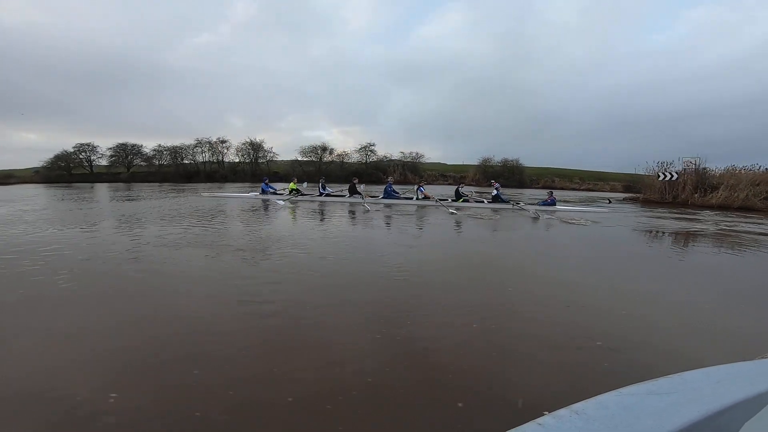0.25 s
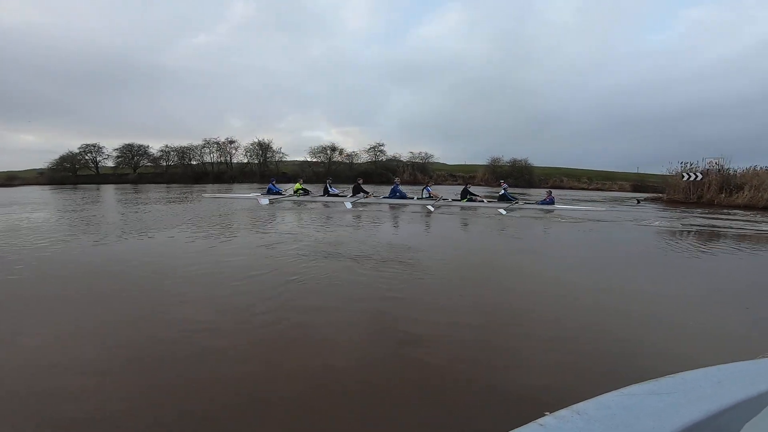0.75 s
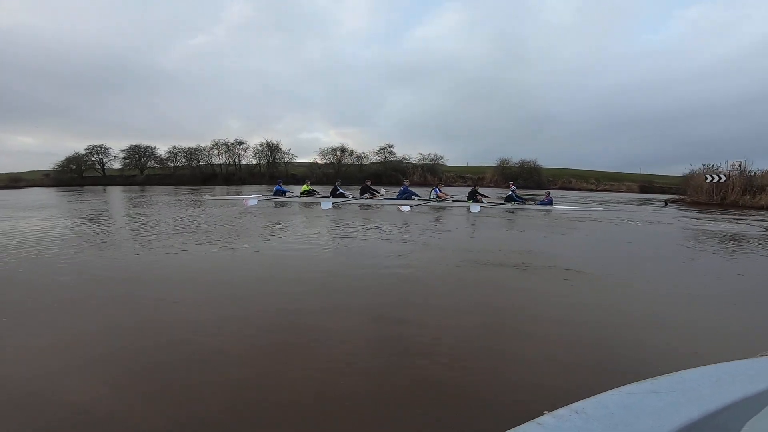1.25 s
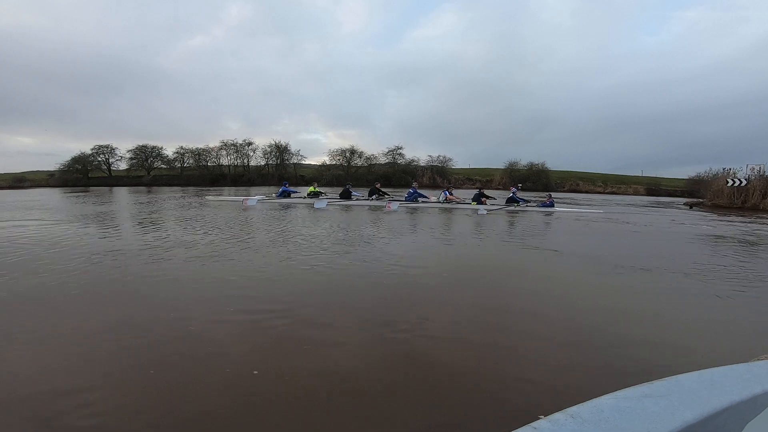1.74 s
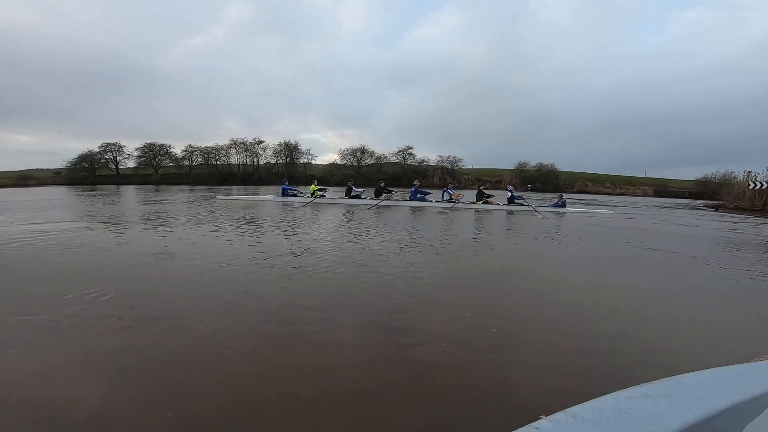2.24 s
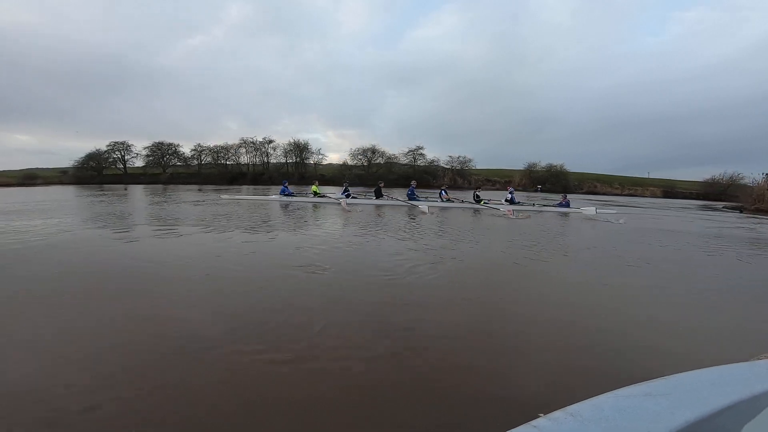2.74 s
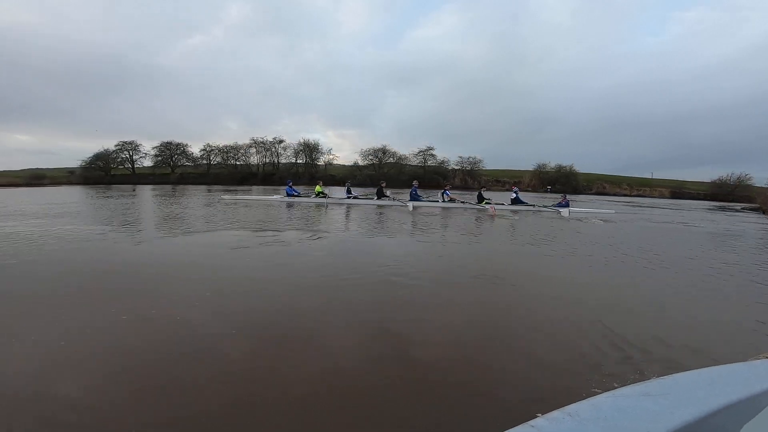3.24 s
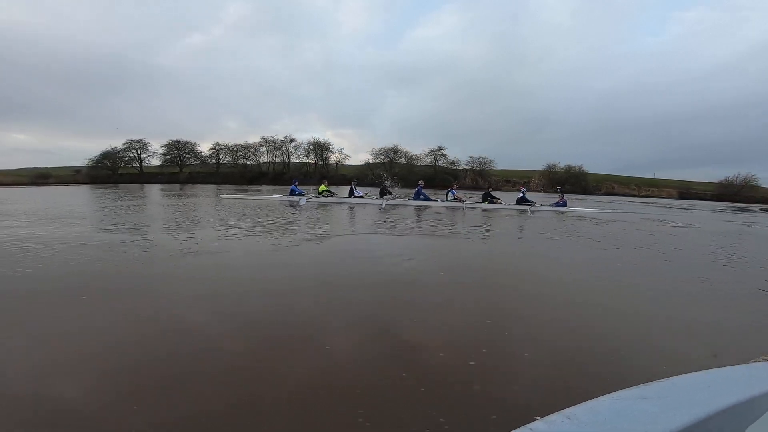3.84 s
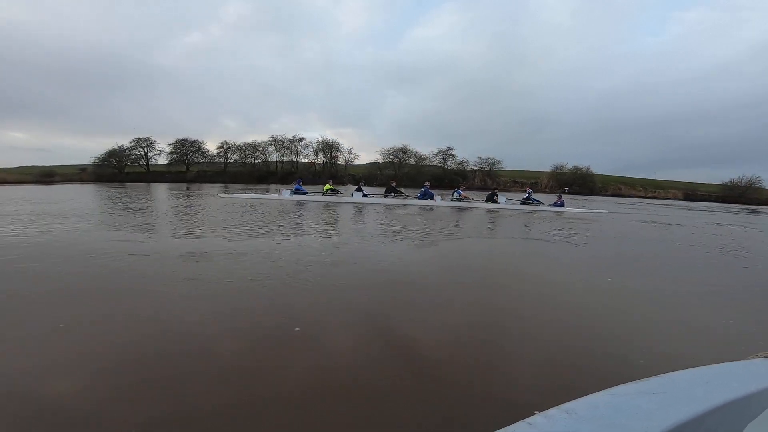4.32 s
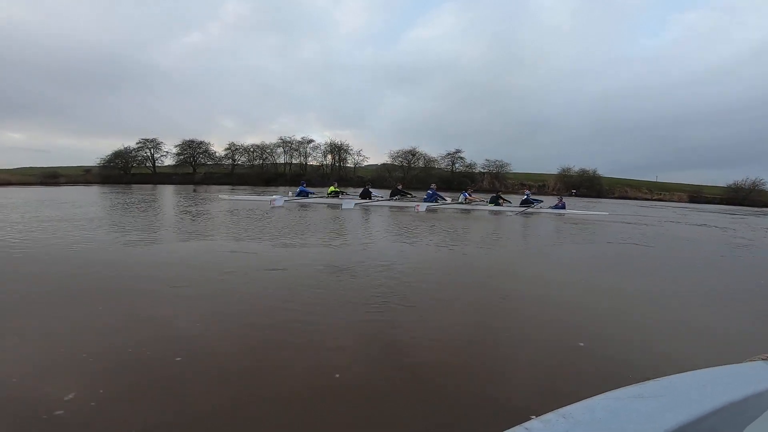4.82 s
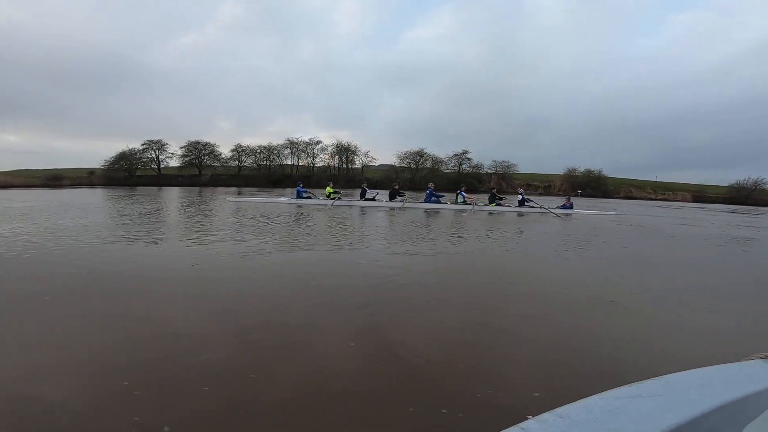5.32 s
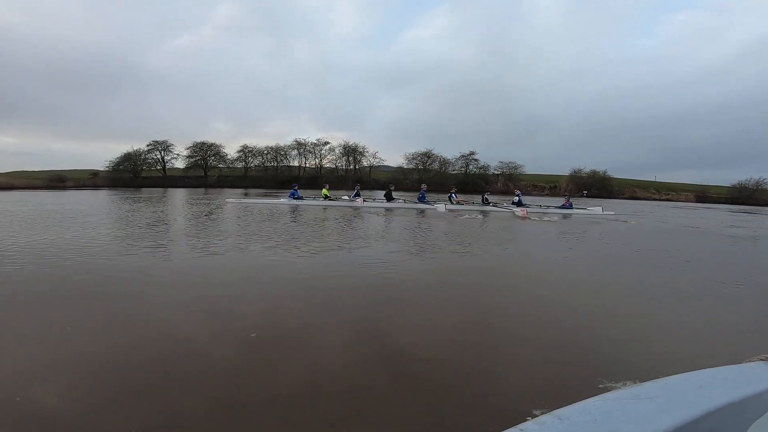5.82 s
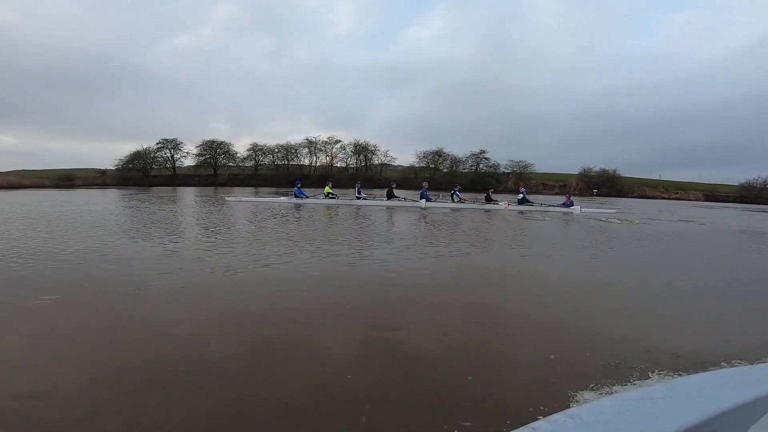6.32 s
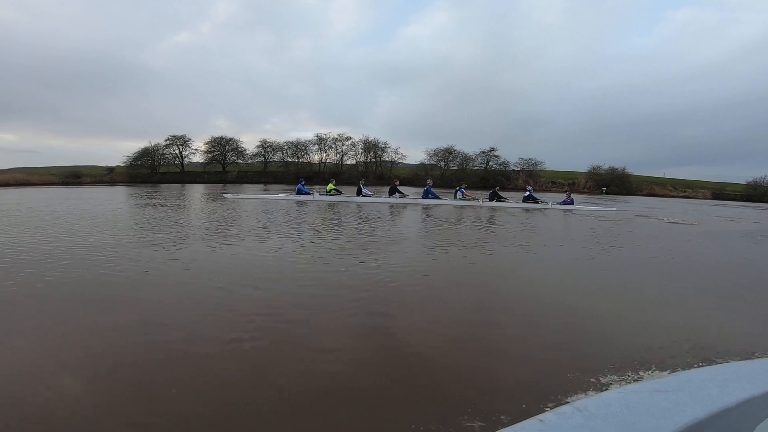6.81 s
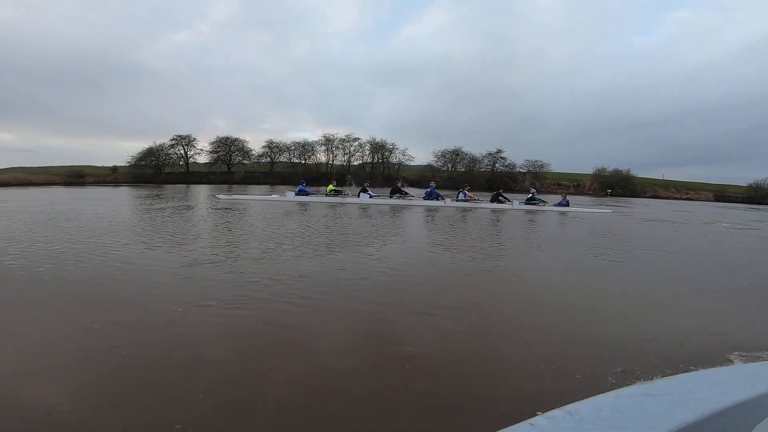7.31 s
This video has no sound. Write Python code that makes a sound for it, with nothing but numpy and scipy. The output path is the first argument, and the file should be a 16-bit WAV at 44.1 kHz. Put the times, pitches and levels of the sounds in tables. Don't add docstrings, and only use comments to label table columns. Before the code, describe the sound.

A small outboard motor hums low and steady aboard a launch, with soft wind thumps, hissing wake and occasional drops ticking on the hull.

```python
import sys
import numpy as np
from scipy import signal
from scipy.fft import rfft, irfft, next_fast_len
from scipy.io import wavfile
from scipy.ndimage import uniform_filter1d, map_coordinates

SR = 44100
rng = np.random.default_rng(int(sys.argv[2]) if len(sys.argv) > 2 else 0)


def field_ratio(decibels):
    return 10 ** (np.asarray(decibels, dtype=float) / 20)


def waveform_to_disk(signal):
    frames = np.transpose(np.atleast_2d(signal))
    scaled = np.clip(frames, -1, 1) * 32767
    samples = np.round(scaled).astype(np.int16)
    wavfile.write(sys.argv[1], SR, samples)


N = 333396

# (time [s], cycle rate [Hz], load [dB], exhaust port clear of water [dB])
MOTOR = [(0, 33.26, -4, -6), (.4, 33.2, 0, 2.5), (.8, 33.1, -2, -3), (1.15, 33.14, -6, 6),
         (1.55, 33.27, -1.5, 4.5), (1.95, 32.83, 1.5, 8), (2.35, 32.26, 1.5, 3.5), (2.75, 32.37, 1, -3),
         (3.5, 32.15, 2, -1.5), (3.95, 32.02, 0, -6.5), (4.6, 32.2, -1.5, 1), (4.95, 31.74, -1, -3.5),
         (5.4, 31.96, -1.5, 1), (6.05, 31.75, -2.5, -4), (6.55, 31.88, 3, -6.5), (6.95, 31.52, 1.5, 4.5),
         (7.3, 31.73, -0.5, 8), (7.56, 31.47, 0, 9)]
# (level [dB], share of load [dB/dB], share of port [dB/dB])
FIRING = [
    (-19.5, 0.98, .01),
    (-23.5, 0.73, .01),
    (-26, 1.32, .01),
    (-31.5, .1, 0.79),
]
# (time [s], length [s], 1st firing order [dB], 2nd [dB], higher [dB])
STUMBLES = [(.2, 0.015, -10, -17, -9), (.26, 0.028, -4, 4, 3), (.4, 0.11, 0, -1.5, -4.5),
            (1.19, .07, 1.5, 3, 1), (2.84, 0.053, -5.5, -5.5, 3.5), (3.77, 0.083, -4.5, 0, 4.5),
            (4.07, 0.032, 4, 1.5, 3), (4.3, 0.049, -5, -6.5, 1.5), (4.95, 0.069, 3, 1, 5.5),
            (5.33, 0.028, 5, -2, 0), (5.62, 0.027, 1, 3.5, 3.5), (5.79, 0.017, 2, -15.5, -10),
            (5.85, 0.028, -8, 9.5, -10), (6.65, .12, -.5, 0.5, 0.5), (7.3, 0.12, -4.5, 0, -3)]
# (order of cycle [1], level [dB])
HALF_ORDERS = [(1, -12), (3, -15.5), (5, -12.5), (7, 2)]
# (order of cycle [1], level [dB])
RASP_ORDERS = [(10, -0.5), (12, -18.5), (14, -26)]
# (order of cycle [1], level [dB])
UPPER_HALF_ORDERS = [(9, -0.2), (11, -10), (13, -29.5)]


def engine_orders():
    cycle_hz, load_db, port_db = curves(MOTOR)
    stumble_db = bumps(STUMBLES)
    faster_hz = cycle_hz - 32
    half_db = -39.5 + 5.5 * faster_hz + 0.58 * port_db
    rasp_db = -37.5 + 3 * faster_hz + 0.45 * port_db
    upper_db = -41 + faster_hz + 0.85 * port_db
    orders = []  # (order, level dB, flutter dB)
    for i, (db, load, port) in enumerate(FIRING):
        level_db = db + load * load_db + port * port_db + stumble_db[min(i, 2)]
        orders.append((2 * i + 2, level_db, 0.4))
    orders += [(k, half_db + db, 0.9) for k, db in HALF_ORDERS]
    orders += [(k, rasp_db + db, 0.8) for k, db in RASP_ORDERS]
    orders += [(k, upper_db + db, 0.9) for k, db in UPPER_HALF_ORDERS]
    return cycle_hz, orders


# (time [s], saw-like lead of each order [rad], water echo lag of 2nd firing order [rad])
PULSE_LEAN = [(0, 1.25, -.35), (1.5, 1.5, .1), (2.5, 1.7, .6), (7.56, 2.05, .75)]


def engine():
    cycle_hz, orders = engine_orders()
    angle = 2 * np.pi * np.cumsum(cycle_hz) / SR + 0.0078 * wobble(9.7)
    lean, echo_lag = curves(PULSE_LEAN)
    out = np.zeros(N)
    for order, level_db, flutter_db in orders:
        k = round(order)
        cowl_lag = 2.2 * np.exp(-((k - 8) / 1.5) ** 2)
        phase = k * angle + lean - cowl_lag + 0.022 * wobble(17)
        if k == 4:
            phase = phase - echo_lag
        out += np.sqrt(2) * field_ratio(level_db + flutter_db * wobble(8.8)) * np.cos(phase)
    return out


# (time [s], length [s], microphone [dB], hull panel [dB], deck [dB])
GUSTS = [(.06, .05, 3, 4, 4), (.27, 0.025, 6, 9.5, 5.5), (.58, 0.071, 3, 2.5, 2), (.96, .04, 4, 6.5, 4),
         (1.25, 0.061, -2.5, 2, 4.5), (2.2, 0.072, -1, 6, 2), (2.7, 0.063, 5.5, -3.5, 2.5),
         (3.39, .04, 10, .5, -0.5), (3.6, 0.057, 4, 7, 7.5), (3.75, 0.054, 4, 4, 6),
         (4.19, 0.038, .5, 1, -5), (5.0, 0.072, 5, 8.5, 7.5), (5.6, 0.068, 11, 8.5, 6.5),
         (5.9, 0.086, 4.5, 1.5, 9.5), (6.42, 0.14, 1, 3.5, 3.5), (6.78, 0.061, 1, 4.5, 6),
         (6.95, 0.032, 10, 4, 3), (7.09, 0.05, 9.5, -2, 3.5), (7.56, 0.051, 13, -4, 1)]
# (frequency [Hz], density [dB/Hz])
BUFFET = [(12, -31.5), (20, -4), (35, -5), (55, 1), (80, -17.5), (140, -39.5)]
# (frequency [Hz], density [dB/Hz])
PANEL = [(30, -25), (70, -8.5), (82, -2), (91, -0.5), (100, -5), (125, -7.5), (170, -21)]
# (frequency [Hz], density [dB/Hz])
DRONE = [(90, -25), (130, -9.5), (160, 1), (215, -1), (250, -6.5), (300, -35)]
# (frequency [Hz], density [dB/Hz])
RATTLE = [(200, -27.5), (250, -6.5), (280, 0.5), (325, -3), (350, -8), (450, -22), (800, -46.5)]


def rumble():
    air_db, hull_db, deck_db = bumps(GUSTS)
    shake_db = 2.2 * (curves(MOTOR)[0] - 32)
    lump_db = 0.7
    panel_db = -28.5 + hull_db + 0.19 * shake_db + lump_db * wobble(8)
    drone_db = -31.1 + deck_db + shake_db + lump_db * wobble(8)
    rattle_db = -39.5 + 1.04 * deck_db + 1.4 * shake_db + lump_db * wobble(9.7)
    gusty = field_ratio(1.1 * wobble(14)) * rng.standard_normal(N)
    out = field_ratio(-34 + air_db) * coloured(gusty, BUFFET)
    for db, body in [(panel_db, PANEL), (drone_db, DRONE), (rattle_db, RATTLE)]:
        out += field_ratio(db) * coloured(rng.standard_normal(N), body)
    return out


# (time [s], stern churn [dB], bow spray [dB])
FLOW = [(0, -1.5, 0.5), (.25, 1.5, 2), (.65, -1.5, 1.5), (1, -1, -0.5), (1.9, 2.5, -.5), (2.3, 0, -1),
        (2.75, 0.5, 1.5), (3.6, -0.5, -2), (4.4, 1, 0.5), (5, 2, 1.5), (5.3, -.5, 1.5), (5.85, 0, 3.5),
        (6.2, -2.5, 4.5), (6.7, -1.5, 2.5), (7, 0.8, 4), (7.3, 0, 2), (7.56, -1.5, 3.5)]
# (start [s], rise [s], hold [s], fall [s], level [dB])
WAVES = [
    (.95, 0.41, 0.54, 0.24, 3),
    (2.6, 0.087, 0.035, 0.082, 2),
    (3.294, 0.15, 0.36, .3, 2),
    (5.5, 0.544, 0.18, 0.11, 1),
    (6.222, 0.19, 0.22, 0.29, 5.5),
    (6.596, 0.31, 0.16, .15, 2.5),
]
# (frequency [Hz], density [dB/Hz])
GURGLE = [(250, -28.5), (380, -2), (650, -3.5), (1000, -8), (1400, -13.5), (2500, -40.5)]
# (frequency [Hz], density [dB/Hz])
WASH = [(700, -29), (1200, -6), (1550, 2.5), (2600, 1.5), (3400, -2), (4000, -15), (5000, -31)]
# (frequency [Hz], density [dB/Hz])
FIZZ = [(2500, -20.5), (3700, 3.5), (4200, -0.5), (5050, -2), (5500, -15), (6500, -43)]
# (frequency [Hz], density [dB/Hz])
SPRAY = [(3000, -19), (4500, 1), (5600, -.5), (7600, -1), (8800, -7), (10300, -12), (12300, -21.5),
         (14200, -33)]


def wake():
    churn_db, spray_db = curves(FLOW)
    wave_db = np.zeros(N)
    for s, rise, hold, fall, db in WAVES:
        wave_db += np.interp(np.arange(N) / SR, np.cumsum([s, rise, hold, fall]), [0, db, db, 0])
    surge_db = 0.17 * wobble(6.9) + 0.5 * wobble(18)
    burst = crackle(per_s=400, spread_db=12)
    layers = [  # (level dB, bubble share, spectrum)
        (-42.7 + churn_db + 0.9 * wobble(7), 0.15, GURGLE),
        (-46.04 + 0.26 * churn_db + 0.3 * spray_db + wave_db, 0.35, WASH),
        (-58 + 1.1 * spray_db + 0.35 * wave_db, 0.35, FIZZ),
        (-64 + spray_db + 0.51 * wave_db, 0.3, SPRAY)]
    out = np.zeros(N)
    for db, share, spectrum in layers:
        water = unit(patchy(depth_db=0.6)) + share * burst
        out += field_ratio(db) * coloured(water, spectrum)
    return field_ratio(surge_db) * out


# (time [s], peak [dB], pitch [Hz], bright edge [dB])
DROPS = [(0.0957, -28.5, 3100, -24), (0.182, -43, 6600, -7), (0.2324, -28.5, 2620, -25),
         (0.3531, -35, 3460, -27), (0.4813, -27.5, 3550, -31), (0.5322, -45, 2718, -24),
         (0.5868, -38.5, 4970, -25), (0.7144, -38, 4900, -15), (1.6521, -37, 3250, -28.5),
         (2.3291, -41, 2572, -18), (2.6663, -33.5, 2781, -31), (2.949, -36, 2548, -20),
         (3.5704, -46, 2676, -23.5), (4.1654, -36, 3270, -28), (5.7703, -27.5, 2599, -23),
         (6.8414, -30.5, 2680, -29), (7.3498, -31.5, 2920, -35)]


def drops():
    out, t = np.zeros(N + SR), np.arange(SR // 20) / SR
    dull = signal.butter(4, [1300, 4900], "band", fs=SR, output="sos")
    bright = signal.butter(3, [5000, 9000], "band", fs=SR, output="sos")
    swell = (1 - np.exp(-t / 0.0014)) ** 2
    for s, db, hz, bright_db in DROPS:
        ring = np.sin(2 * np.pi * hz * t) + 0.32 * np.sin(2 * np.pi * 1.36 * hz * t)
        ping = 0.75 * field_ratio(-60 * t / 0.024) * ring
        spatter = rng.standard_normal(len(t))
        splat = 1.32 * signal.sosfilt(dull, spatter)
        edge = field_ratio(bright_db + 8.5) * signal.sosfilt(bright, spatter)
        tick = field_ratio(-60 * t / 0.025) * (splat + edge)
        out[round(s * SR):][:len(t)] += field_ratio(db + 1.5) * swell * (ping + tick)
    return out[:N]


def unit(x):
    return x / np.sqrt(np.mean(x ** 2) + 1e-20)


def curves(rows):
    s, *cols = np.transpose(rows)
    return [np.interp(np.arange(N) / SR, s, c) for c in cols]


def slow(values):
    return np.interp(np.arange(N), np.arange(0, N, 64), values)


def bumps(rows):
    s, length, *cols = np.transpose(rows)
    t = np.arange(0, N, 64)[:, None] / SR
    bell = np.exp(-0.5 * ((t - s) / length) ** 2)
    return [slow(bell @ c) for c in cols]


def wobble(rate):
    knots = rng.standard_normal(int(N * rate / SR) + 4)
    return slow(map_coordinates(knots, [np.arange(0, N, 64) * rate / SR]))


def coloured(x, spectrum):
    m = next_fast_len(N + 8192)
    f, db = np.transpose(spectrum)
    log_hz = np.log(np.fft.rfftfreq(m, 1 / SR) + 1)
    gain = field_ratio(np.interp(log_hz, np.log(f + 1), db, -120, -120))
    return unit(irfft(rfft(x, m) * gain, m)[:N])


def patchy(depth_db):
    z = signal.stft(rng.standard_normal(N), nperseg=512)[2]
    field = uniform_filter1d(rng.standard_normal(z.shape), size=8, axis=0)
    field = uniform_filter1d(field, size=8, axis=1)
    return signal.istft(z * field_ratio(depth_db * unit(field)), nperseg=512)[1][:N]


def crackle(per_s, spread_db):
    hit = rng.random(N) < per_s / SR
    return unit(hit * rng.uniform(-1, 1, N) * field_ratio(spread_db * rng.random(N)))


def scene():
    return (engine() + rumble() + wake() + drops())[None]


def top_cut(x):
    return signal.sosfilt(signal.butter(12, 14200, fs=SR, output="sos"), x)


def record(dry):
    bass = signal.sosfiltfilt(signal.butter(4, 350, fs=SR, output="sos"), dry)

    def power(window_s):
        size = round(window_s * SR)
        return np.abs(uniform_filter1d(uniform_filter1d(bass ** 2, size=size), size=size)) + 1e-9

    bass_gain = (power(0.031) / power(0.3)) ** -0.2
    even = dry + bass * (bass_gain - 1)
    soft = even / (1 + np.abs(even / 0.8) ** 4) ** (1 / 4)
    return top_cut(soft)


dry = scene()
out = record(dry)
waveform_to_disk(out)
```